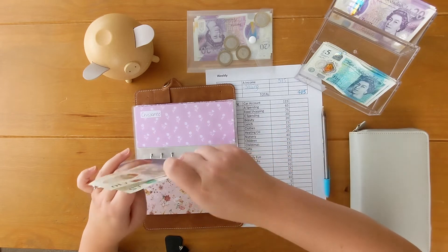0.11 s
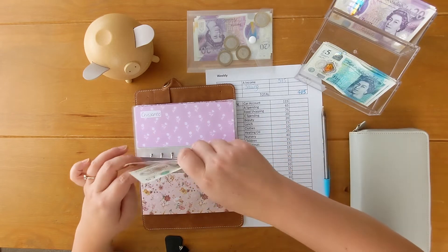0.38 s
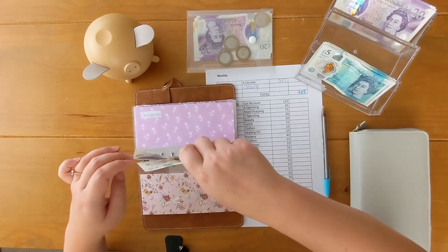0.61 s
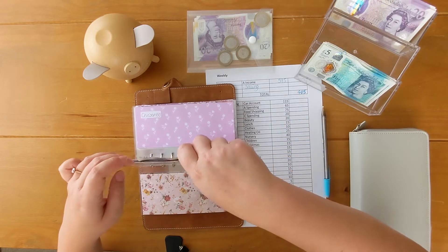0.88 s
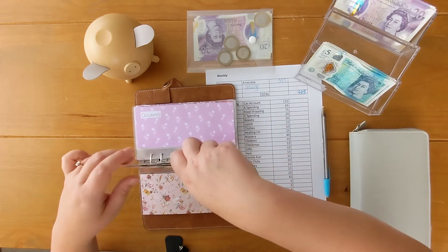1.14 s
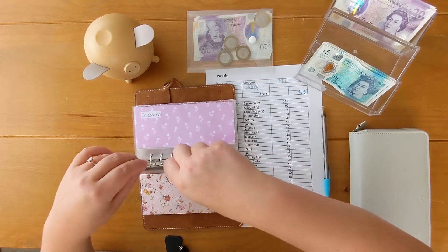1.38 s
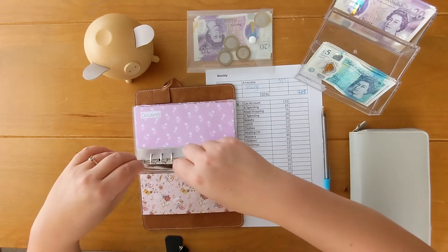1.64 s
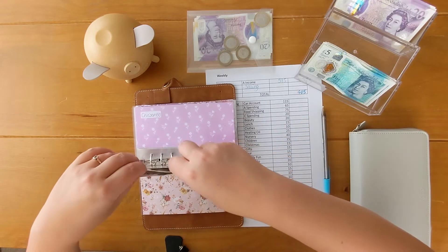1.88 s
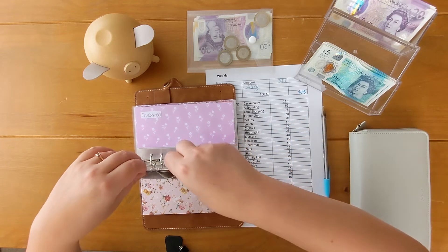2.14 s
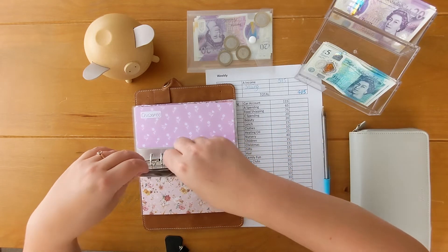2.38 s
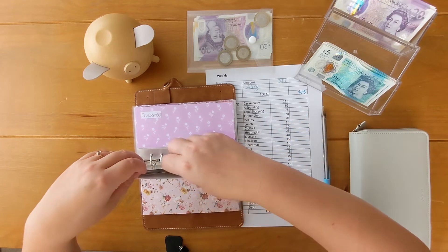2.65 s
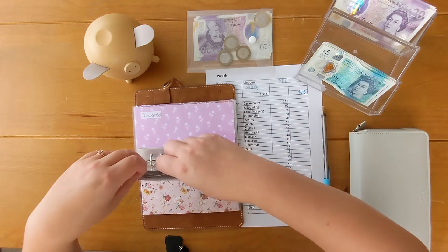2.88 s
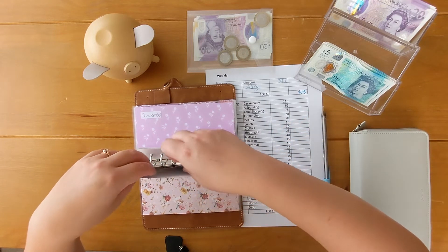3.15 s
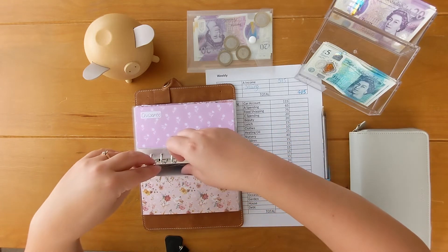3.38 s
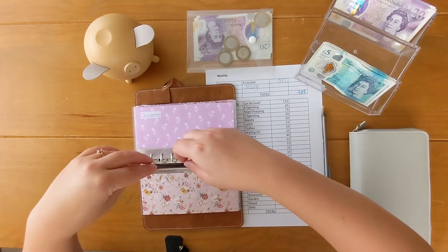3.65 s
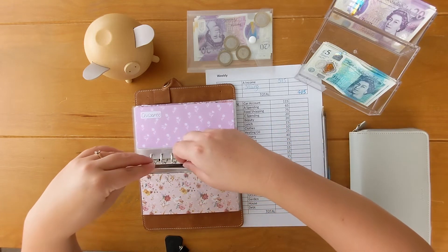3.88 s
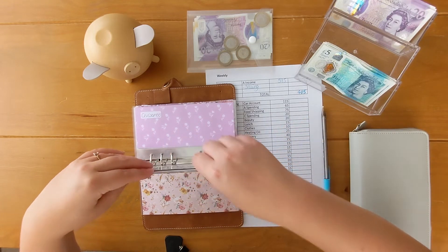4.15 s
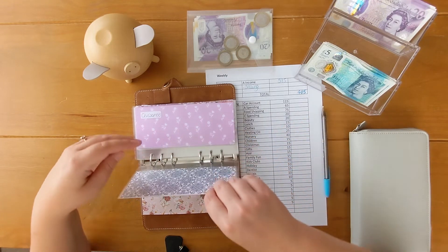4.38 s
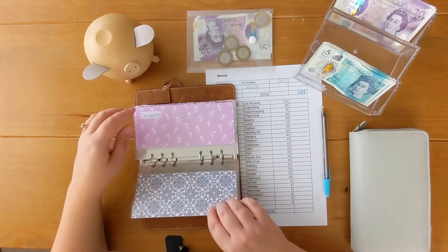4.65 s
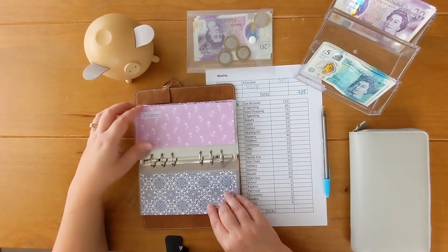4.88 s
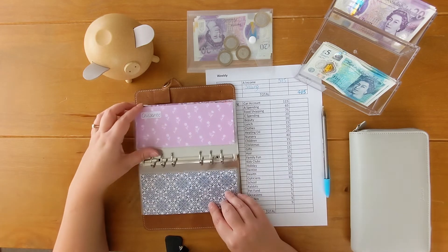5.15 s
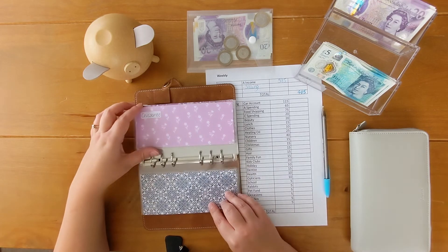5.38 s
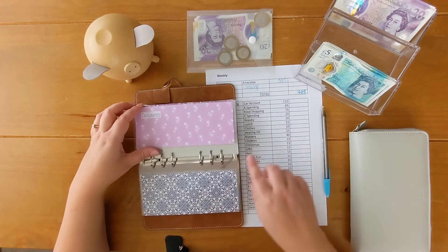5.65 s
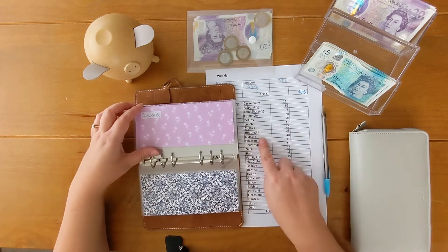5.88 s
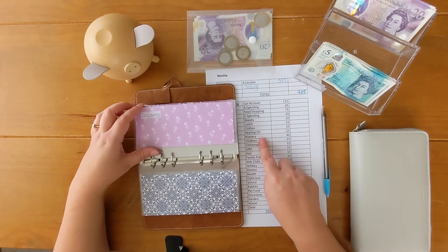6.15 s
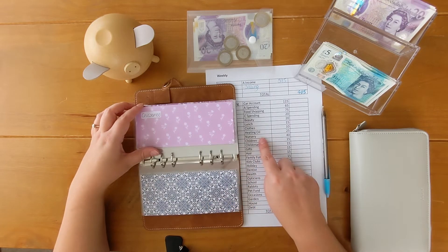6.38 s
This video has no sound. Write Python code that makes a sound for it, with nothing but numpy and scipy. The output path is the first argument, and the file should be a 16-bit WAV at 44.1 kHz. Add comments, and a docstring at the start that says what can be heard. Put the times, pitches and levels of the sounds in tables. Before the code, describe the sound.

Throughout, a one-cylinder lawn mower drones low and muffled outside closed windows, slightly uneven, with a resonant pane hum and thin hiss. In the foreground of a small, short-echoing room, hands work notes into a plastic binder envelope: a soft rub and knock at 0 s, bright crackles and snaps around 0.25-0.35, then duller rubbing and low knocks from 0.5 to 0.8. Crisp short snaps come at 1.1-1.2, light scuffs at 1.5 and 1.75, more rustles and ticks at 2.05-2.5. A sparse spell follows, with faint touches near 3.3-3.4 and a snap at 3.75. The mower grows clearly stronger from about 3.7, pulsing and wavering. The envelope turns with clicks and soft flicks at 4.2-4.5, then settles with brighter snaps and rubs at 4.7-5. From 5.45 to 6.4 a fingertip slides faintly down paper, with a small scuff at 5.8, under the nearing engine.

```python
"""A one-cylinder lawn mower outside closed windows drones throughout and comes nearer: harmonic orders of its
firing rate, resonating panes and a thin hiss of filtered noise. From the start, hands slide notes into a plastic
envelope of a ring binder and turn it: enveloped noise rubs, noise bursts through resonances snap, struck
resonances knock softly. Late on, a fingertip slides down a sheet: grains of noise through fluttering bands.
Snaps and knocks reverberate in a small room over steady room and microphone noise."""
import sys
import numpy as np
from scipy import signal
from scipy.fft import rfft, irfft, next_fast_len
from scipy.io import wavfile

SR = 44100
rng = np.random.default_rng(int(sys.argv[2]) if len(sys.argv) > 2 else 0)


def to_wav(sig):
    """Store sig (one row per channel, or 1-D mono) as 16-bit WAV at the path in sys.argv[1].

    Samples outside -1..1 are clipped; the rate is SR.
    """
    pcm = np.clip(np.atleast_2d(sig), -1, 1) * 32767
    pcm = np.round(pcm).astype(np.int16)
    wavfile.write(sys.argv[1], SR, pcm.T)  # frames by channels


def ratio_of_db(decibels):
    """Turn decibels (scalar or array-like) into linear amplitude factors; 0 dB maps to 1."""
    return 10 ** (np.asarray(decibels, float) / 20)


N = 287300   # samples

# snaps of plastic on the rings; the crack level is relative to the strength:
# start_s, strength_db, low_ring_hz, crack_db, crack_hz
SNAPS = [(0.029, -45.5, 950, 2, 2700), (0.237, -39, 1590, 13, 6100), (0.242, -47, 705, 14.5, 6300),
         (0.332, -41.5, 825, 9.5, 3800), (0.338, -51, 796, 14.5, 6100), (0.654, -46, 910, 5, 5170),
         (1.095, -42, 815, 3, 4700), (1.1775, -45, 720, 10.5, 3970), (1.215, -47.5, 805, 8.5, 2860),
         (2.191, -49, 1140, 6, 4100), (2.382, -50, 1690, 6.5, 7750), (2.403, -50.5, 1000, 6, 4000),
         (3.281, -51.5, 830, 6.5, 2190), (3.754, -43.5, 844, 8.5, 3220), (4.185, -45.5, 1130, -7, 2800),
         (4.306, -51.5, 1600, -11.5, 2960), (4.364, -43, 1550, -3, 2440), (4.499, -49, 770, -23, 2440),
         (4.731, -44, 1600, 7.5, 5040), (4.785, -45.5, 1560, -9, 2790), (4.843, -53, 1510, -19, 2590),
         (4.855, -49, 1770, 9, 4300), (4.953, -50, 1180, -15, 3130)]
HANDS_LAG_S, ENGINE_LAG_S = 0.00013, 0.00008   # the left microphone hears later
FLAT = [(10, 0), (20000, 0)]   # white spectrum: frequency_hz, level_db


def rms_one(x):
    """Normalisation to unit root-mean-square."""
    return x / np.sqrt(np.mean(x ** 2) + 1e-20)


def in_time(rows):
    """Linear interpolation of each column of a curve, one value a sample."""
    s, *columns = np.transpose(rows)
    return [np.interp(np.arange(N) / SR, s, c) for c in columns]


def at_hz(points, hz):
    """Interpolation of a spectrum on a logarithmic frequency axis."""
    point_hz, value = np.array(points).T
    return np.interp(np.log(hz), np.log(np.maximum(point_hz, 1)), value)


def drift(rate_hz):
    """Slow random fluctuation: noise through two equal one-pole low-passes, normalised to spread 1."""
    step = 40   # computed at every 40th sample, then interpolated
    r = np.exp(-2 * np.pi * step * rate_hz / SR)
    noise = rng.standard_normal(N // step + 2002)
    slow = signal.lfilter([1], [1, -2 * r, r * r], noise)[2000:]   # past the filter's onset
    return np.interp(np.arange(N) / step, np.arange(len(slow)), rms_one(slow - slow.mean()))


def coloured(x, spectrum, lag_s):
    """Spectral shaping with partial coherence between the channels and an arrival lag on the left; rms 1."""
    # left-right likeness: frequency_hz, coherence (share)
    likeness = [(60, 0.65), (240, 0.49), (500, 0.27), (950, 0.46), (3770, 0.26), (15000, 0.086)]
    hz = np.maximum(np.fft.rfftfreq(N, 1 / SR), 1)
    mid, side = rfft(x)
    alike = np.clip(at_hz(likeness, hz), 0, 1)
    both = np.sqrt(1 + alike) * mid + np.sqrt(1 - alike) * side * [[1], [-1]]
    both[0] *= np.exp(-2j * np.pi * hz * lag_s)
    return rms_one(irfft(both * ratio_of_db(at_hz(spectrum, hz)), N))


def resonance(x, hz, width_hz):
    """Damped resonator: a click of height 1 rings as a dying sine of initial height 1."""
    r, w = np.exp(-np.pi * width_hz / SR), 2 * np.pi * hz / SR
    return signal.lfilter([0, np.sin(w)], [1, -2 * r * np.cos(w), r * r], x + 1e-18)


def band(x, low_hz, high_hz):
    """Butterworth band-pass filtering."""
    return signal.sosfilt(signal.butter(2, [low_hz, high_hz], "band", fs=SR, output="sos"), x)


def pair(x, lag_s, left_db):
    """Arrival-time and level difference of one source at two microphones, the left one later."""
    n = np.arange(N)
    return np.array([ratio_of_db(left_db) * np.interp(n - lag_s * SR, n, x), x])


def wandering(x, pace):
    """Frequency modulation by reading at an uneven pace, so that the pitch glides."""
    at = np.cumsum(pace) % (N - 1)
    return np.array([np.interp(at, np.arange(N), side) for side in x])


def mower():
    """Periodic combustion: orders locked to the firing cycle, with noise modulated by the firings."""
    # firing rate: time_s, rate_hz
    firing_speed = [(0.0, 22.9), (0.54, 23.2), (0.85, 23.1), (1.18, 22.5), (1.61, 23.4), (1.81, 22.8),
                    (1.98, 22.9), (2.25, 22.4), (2.55, 22.5), (2.7, 23.1), (3.06, 22.6), (3.28, 22.9),
                    (3.64, 22.1), (4.02, 22.4), (4.1, 22.0), (4.21, 21.7), (4.48, 22.7), (4.95, 21.8),
                    (5.06, 22.1), (5.17, 21.8), (5.31, 22.6), (5.56, 22.8), (5.66, 22.7), (5.77, 21.0),
                    (5.91, 22.3), (6.29, 22.7), (6.42, 22.6), (6.51, 22.1)]
    # upper drone; the pane level is relative to the drone, before a fixed offset: time_s, drone_db, pane_db
    upper_curve = [(0.0, -67, 8.5), (2.0, -65.5, 5), (2.5, -65.5, 8), (3.2, -67.5, 9), (3.6, -66.5, -21),
                   (3.8, -63, -12), (4.7, -62.5, -4), (4.9, -62.5, 0), (5.5, -64, 13), (5.72, -59, 6),
                   (5.9, -60.5, 6.5), (6.51, -62, 11)]
    speed, = in_time(firing_speed)
    drone_db, pane_db = in_time(upper_curve)
    # uneven firings: phase jitter in radians
    turn = 2 * np.pi * np.cumsum(speed) / SR + 0.028 * drift(13.3)
    upper = ratio_of_db(drone_db - 5.5) * upper_drone(turn, pane_db)
    tones = low_orders(turn, speed) + second_pane() + upper
    engine = pair(tones, ENGINE_LAG_S, -0.58) + fourth_order(turn)
    return engine + rumble(turn, drone_db) + hiss(turn, speed)


def order_tone(order, level_db, turn):
    """A harmonic of the firing cycle with fluctuating level and dispersed phase."""
    # silencer, wall and window smear each firing: the phase bends with the order and wanders as the mower moves
    phase = 0.2 * (order - 7) ** 2 + 0.6 * drift(2)
    return ratio_of_db(level_db + 1.4 * drift(9)) * np.sqrt(2) * np.cos(order * turn + phase)


def low_orders(turn, speed):
    """Harmonic synthesis: low orders whose levels follow nearness and load, or curves of their own."""
    # the mower comes nearer: time_s, gain_db
    nearing = [(0.0, 0.5), (2.1, 0), (2.4, 3), (2.8, 2), (3.3, 1.5), (3.7, 2), (5.1, 7.5), (5.5, 3.5),
               (6.51, 8)]
    # orders following nearness and load:
    # multiple of the firing rate, far_db, share of the nearing gain, db per firing/s lost, wavering_db
    loaded_orders = [(2, -73.5, 1.0, 1, 0.5), (3, -71.5, 0.9, 3, 1.2), (5, -78, 2.2, 2, 2.5),
                     (7, -57.5, 0.5, 1.5, 1.2), (9, -61.5, 1.3, -5, 1.5), (10, -74, 1.8, 2, 3)]
    # levels of the sixth, eighth and twelfth orders: time_s, level_db
    sixth, eighth, twelfth = [(0.0, -51.5), (3.3, -50), (3.97, -42.5), (4.04, -47), (4.44, -42),
                              (4.51, -53), (4.73, -44), (5.329, -43.5), (5.4, -75), (5.44, -49.5),
                              (5.78, -47.5), (5.82, -64), (5.93, -45), (6.51, -61)], [(0.0, -56), (0.03, -60), (1.92, -55), (2.05, -73), (2.23, -47),
                                             (2.37, -55.5), (2.59, -46), (2.86, -60), (3.01, -47.5),
                                             (3.19, -51.5), (3.3, -70), (3.34, -53), (3.83, -38),
                                             (3.88, -49), (4.13, -39.5), (4.35, -50), (4.41, -47),
                                             (4.71, -59.5), (4.77, -46), (4.95, -35), (5.08, -54),
                                             (5.39, -43.5), (5.56, -53.5), (5.86, -38.5), (6.0, -51.5),
                                             (6.07, -42.5), (6.24, -41.5), (6.36, -55), (6.51, -39)], [(0.0, -70.5), (0.9, -71), (2.0, -77),
                                                             (3.1, -84.5), (4.6, -67), (4.9, -67),
                                                             (5.2, -69), (5.4, -69.5), (6.1, -66),
                                                             (6.35, -63), (6.51, -60.5)]
    near_db, = in_time(nearing)
    free_speed = 23.0   # firings per s without load
    sag = np.minimum(free_speed - speed, 1.2)
    out = np.zeros(N)
    for order, far_db, share, load_db, waver_db in loaded_orders:
        level_db = far_db + share * near_db + load_db * sag + waver_db * drift(3.3)
        out += order_tone(round(order), level_db, turn)
    for order, curve in ((6, sixth), (8, eighth), (12, twelfth)):
        out += order_tone(order, in_time(curve)[0], turn)
    return out


def fourth_order(turn):
    """A standing wave of the room makes the fourth order differ in phase and level at the microphones."""
    # level of the order: time_s, level_db
    fourth = [(0.0, -60), (0.3, -66.5), (0.7, -56), (1.4, -60.5), (2.3, -58.5), (2.55, -59.5), (2.72, -67),
              (3.1, -59), (3.4, -57), (3.7, -52), (4.4, -57), (4.8, -50), (5.4, -52.5), (5.9, -52.5),
              (6.2, -51.5), (6.51, -49.5)]
    return pair(order_tone(4, in_time(fourth)[0], turn), 0.0011, 1.1)


def upper_drone(turn, pane_db):
    """Forced resonance: the upper orders, at rms 1, drive the ringing of a window pane."""
    # upper orders: multiple of the firing rate, level_db relative to the other orders
    upper_orders = [(11, -3), (13, -3), (15, -10), (16, 1.5), (17, -6), (18, 0), (19, -23), (21, -22),
                    (23, -1)]
    upper = sum(ratio_of_db(db + 4.5 * drift(3)) * np.cos(round(k) * turn + 0.4 * drift(1.5))
                for k, db in upper_orders)
    pane = rms_one(resonance(upper, 351, 26))   # Hz, width Hz
    return rms_one(upper) + ratio_of_db(pane_db - 5) * pane


def second_pane():
    """Narrow-band noise: a second pane hums at its own pitch once the mower is close."""
    # level of the hum: time_s, level_db
    hum_level = [(0.0, -98), (4.8, -92), (4.9, -64.5), (5.4, -78), (5.6, -68), (6.1, -60), (6.51, -61.5)]
    pitch_hz, width_hz = 345, 9
    shake = resonance(rng.standard_normal(N), pitch_hz, width_hz)
    return ratio_of_db(in_time(hum_level)[0]) * rms_one(resonance(shake, pitch_hz, 2 * width_hz))


def rumble(turn, drone_db):
    """Amplitude-modulated noise: exhaust noise between the orders, puffing slightly with each firing."""
    # exhaust spectrum: frequency_hz, level_db per Hz
    rumble_colour = [(30, -30), (60, -24), (110, -18), (170, -9), (220, -14), (260, -24), (310, -26),
                     (400, -17), (570, -24), (900, -34), (1500, -60)]
    puff = 1 + 0.021 * np.cos(turn)
    noise = coloured(rng.standard_normal((2, N)), rumble_colour, ENGINE_LAG_S)
    return ratio_of_db(drone_db + 1.5) * puff * noise


def hiss(turn, speed):
    """Flow noise of blade and exhaust through the window gaps, flaring with each firing."""
    # level before a fixed gain, of the air part between flares: time_s, level_db
    hiss_level = [(0.0, -84), (1.52, -81), (3.17, -78.5), (3.55, -76.5), (6.51, -76.5)]
    # spectrum: frequency_hz, level_db per Hz
    hiss_colour = [(350, -61), (600, -16), (1120, -2.5), (1310, -27), (1440, -12), (1720, -11),
                   (3100, -1.5), (9000, -16.5), (11700, -25), (19800, -120)]
    air = coloured(rng.standard_normal((2, N)), hiss_colour, HANDS_LAG_S)
    flare = 1 + 0.45 * (0.5 + 0.5 * np.cos(turn)) ** 3
    level = ratio_of_db(in_time(hiss_level)[0] + 5.0 + 1.53 * drift(11.8))
    return level * flare * (air + ratio_of_db(-6.5) * whirring(speed))


def whirring(speed):
    """Resonant bands of noise, each swelling and wandering in pitch on its own as the speed changes."""
    # whirring bands, levels relative to each other: pitch_hz, width_hz, level_db
    whir_bands = [(511.5, 19, -7.5), (788.5, 24, -6), (1276, 260, -7), (2320, 540, -12), (3160, 99, -7),
                  (3686, 64, -11.5), (4030, 68, -17.5), (4380, 110, -11), (5270, 92, -7.5), (6155, 150, -6),
                  (6970, 720, -1)]
    white = coloured(rng.standard_normal((2, N)), FLAT, HANDS_LAG_S)
    usual_speed = 22.4   # firings per s
    glide = 1 + 0.7 * (speed / usual_speed - 1)   # 0.7 of the relative speed change
    out = np.zeros((2, N))
    for hz, width_hz, db in whir_bands:
        tone = rms_one(resonance(resonance(white, hz, width_hz), hz, width_hz))
        pace = glide + 0.01 * drift(1.5)
        out += ratio_of_db(db + 2.2 * drift(4)) * wandering(tone, pace)
    return out


def friction_grains(spread_db):
    """Stick-slip friction: white noise whose level jumps at every sample and drifts by spread_db."""
    jump_db = 2.5 * np.minimum(rng.exponential(1, N), 5)
    return rng.standard_normal((2, N)) * ratio_of_db(jump_db + spread_db)


def rubbing():
    """Frictional noise of notes and fingers: bright from the plastic, dull where the envelope resonates."""
    # strokes on plastic and paper; bright level is that of the 8-15.5 kHz band:
    # start_s, length_s, bright_db, dull_db, dull_ring_hz
    strokes = [(0, 0.32, -103, -73.5, 1630), (0.024, 0.3, -103, -68.5, 900), (0.243, 0.29, -67, -63, 1480),
               (0.324, 0.19, -70, -65, 760), (0.237, 0.5, -76.5, -77, 3700),
               (0.477, 0.14, -69, -67.5, 1300), (0.5, 0.16, -92, -62.5, 670), (0.616, 0.11, -78, -76, 900),
               (0.69, 0.16, -99, -71.5, 694), (0.818, 0.11, -85, -81, 1000),
               (1.091, 0.051, -69, -57.5, 1430), (1.173, 0.038, -64.5, -57, 1520),
               (1.213, 0.081, -68, -64.5, 1530), (1.481, 0.17, -63.5, -61, 2500),
               (1.757, 0.15, -67, -99, 3100), (2.043, 0.17, -72, -62, 2420), (2.186, 0.031, -66, -77, 1500),
               (2.221, 0.086, -76, -68, 885), (2.403, 0.077, -67, -68, 910), (2.439, 0.16, -75, -64, 1960),
               (3.39, 0.14, -72, -95, 3330), (3.753, 0.061, -75, -58, 1030), (3.969, 0.047, -68, -66, 1290),
               (4.26, 0.096, -82, -90, 1510), (4.722, 0.39, -77, -79, 1610),
               (4.929, 0.064, -66, -60.5, 1510), (5.807, 0.12, -68.5, -91, 3000)]
    # spectrum: frequency_hz, level_db per Hz
    rub_colour = [(290, -22), (500, -21), (562, -1), (795, 6.5), (880, 1), (960, 8), (1840, 11), (2770, 11),
                  (10500, 1), (15100, 2.5), (16000, -77)]
    sound = coloured(friction_grains(1.6 * drift(150)), rub_colour, HANDS_LAG_S)
    bright = band(sound, 2200, 17000) / np.std(band(sound, 8000, 15500))
    # faint uneven rubbing while the notes go in
    s = np.arange(N) / SR
    fidget_start_s, fidget_end_s, fidget_db = 0.19, 2.5, -81
    busy = np.clip(np.minimum(s - fidget_start_s, fidget_end_s - s) / 0.085, 0, 1)
    out = busy * ratio_of_db(fidget_db + 3.0 * drift(0.66)) * bright
    for at, length_s, bright_db, dull_db, dull_hz in strokes:
        nearest = min((snap[0] for snap in SNAPS), key=lambda snap_s: abs(snap_s - at))
        snapped = abs(nearest - at) < 0.008
        at = nearest if snapped else at   # a snap sets the stroke off
        span = slice(round(at * SR), round((at + length_s) * SR))
        share = np.linspace(0, 1, span.stop - span.start)
        skew = 0.33 if snapped else 0.88   # 1 = symmetric, less = earlier peak
        swell = np.sin(np.pi * share ** skew) ** 1.34
        ring = resonance(sound[:, span], dull_hz, 0.7 * dull_hz)
        dull = rms_one(ring + 0.068 * band(sound[:, span], 500, 3000))
        out[:, span] += swell * (ratio_of_db(bright_db) * bright[:, span] + ratio_of_db(dull_db) * dull)
    return out


def snaps():
    """Impulsive excitation: a short dying noise burst drives a crack, a low ring and the envelope's modes."""
    # modes of envelope and binder, levels relative to each other: pitch_hz, width_hz, level_db
    envelope_modes = [(844, 36, 9), (1290, 360, 14), (1600, 75, 10.5), (2500, 50, -39)]
    s = np.arange(int(0.1 * SR)) / SR
    out = np.zeros(N + len(s))
    for at, strength_db, ring_hz, crack_db, crack_hz in SNAPS:
        decay = np.exp(-s / 0.0028) + 0.59 * np.exp(-s / 0.00041) + 0.024 * np.exp(-s / 0.008)
        burst = rng.standard_normal(len(s)) * decay
        late = burst * (1 - np.exp(-s / 0.002))   # ring and modes build up after the crack
        ring = resonance(late, ring_hz, 145)
        modes = sum(ratio_of_db(db + rng.normal(0, 3)) * resonance(late, hz, width_hz)
                    for hz, width_hz, db in envelope_modes)
        crack = burst * (np.exp(-s / 0.0015) + 0.18)   # dies sooner than the ring
        middle = resonance(crack, crack_hz, 0.24 * crack_hz) + 1.6 * band(crack, 1630, 7000)
        treble = band(crack, 6000, 12000)
        parts = ring, modes, middle, treble
        shares = 0.6, 0.22, ratio_of_db(crack_db), ratio_of_db(crack_db - 12.5)
        i = round(at * SR)
        mixed = sum(share * part / abs(part).max() for share, part in zip(shares, parts))
        out[i:i + len(s)] += ratio_of_db(strength_db) * mixed
    return out[:N]


def singing():
    """Resonant filtering: a stroke makes the envelope sing on one narrow tone, rising fast and fading."""
    # sung tones: start_s, length_s, level_db, pitch_hz
    sung_tones = [(0.032, 0.28, -68, 1623), (0.032, 0.14, -82, 2430), (0.05, 0.19, -81, 4660),
                  (0.335, 0.14, -69, 793), (0.34, 0.12, -74, 3710), (2.402, 0.037, -56.5, 820),
                  (4.665, 0.057, -64, 790), (4.973, 0.084, -64, 776)]
    out = np.zeros((2, N))
    for at, length_s, db, hz in sung_tones:
        i, size = round(at * SR), round(length_s * SR)
        noise = pair(rng.standard_normal(N), HANDS_LAG_S, 0)[:, :size]
        width_hz = 0.035 * hz
        tone = rms_one(resonance(resonance(noise, hz, width_hz), hz, 2 * width_hz))
        swell = np.sin(np.pi * np.linspace(0, 1, size) ** 0.2)
        out[:, i:i + size] += ratio_of_db(db) * swell * tone
    return out


def knocks():
    """Impulse response of two damped modes: a soft push of a hand sets the binder ringing dully."""
    # knocks on the binder: start_s, push_db, pitch_hz
    pushes = [(0.029, -52, 259), (0.53, -52, 400), (0.58, -44, 304), (0.73, -48, 307), (0.763, -50, 308),
              (1.219, -56, 283), (4.367, -52, 604)]
    out = np.zeros(N)
    for at, push_db, hz in pushes:
        push = np.zeros(N)
        push[round(at * SR)] = ratio_of_db(push_db)
        out += resonance(push, hz, 54) + 0.83 * resonance(push, 1.38 * hz, 55)
    return out


def slide():
    """Stick-slip of a fingertip on paper excites bands of the sheet, each fluttering on its own."""
    # bands in which the sheet sings, levels relative to each other: pitch_hz, width_hz, level_db
    sheet_bands = [(950, 890, -5), (1380, 170, -4.5), (2590, 170, -9), (3100, 320, -5), (3900, 140, -8),
                   (4460, 500, -1), (4950, 300, -11)]
    start_s, length_s, level_db = 5.44, 1, -64
    grains = coloured(friction_grains(2 * drift(40)), FLAT, HANDS_LAG_S)
    bands = sum(ratio_of_db(db + 2.5 * drift(11)) * rms_one(resonance(grains, hz, width_hz))
                for hz, width_hz, db in sheet_bands)
    sound = rms_one(band(rms_one(bands) + 0.39 * grains, 960, 5500))
    share = np.clip((np.arange(N) / SR - start_s) / length_s, 0, 1)
    return ratio_of_db(level_db) * np.sin(np.pi * share) ** 1.5 * sound


def room(x):
    """Reverberation by recirculating delays, six a side, duller on every round as walls absorb treble."""
    t60_s, wall_cut_hz = 0.098, 4600
    out, dull = np.zeros((2, N)), np.exp(-2 * np.pi * wall_cut_hz / SR)
    lags = (rng.uniform(0.0048, 0.038, 12) * SR).astype(int)   # samples
    for k, lag in enumerate(lags):
        loop, gain, state = x.copy(), ratio_of_db(-60 * lag / SR / t60_s), [0.]
        for i in range(lag, N, lag):
            back, state = signal.lfilter([gain * (1 - dull)], [1, -dull], loop[i - lag:i], zi=state)
            loop[i:i + lag] += back[:N - i]
        out[k % 2] += (loop - x) * (-1) ** (k // 2)
    return out


def noise_floor():
    """Stationary coloured noise of room and microphones."""
    # spectrum: frequency_hz, level_db per Hz
    floor_colour = [(290, -42), (500, -11), (708, -10.5), (784, -2), (933, -7.5), (1840, -8.5),
                    (3110, -17.5), (5710, -29), (7000, -15.5), (7980, -23.5), (10800, -25), (15100, -15),
                    (16000, -26)]
    return ratio_of_db(-72.5) * coloured(rng.standard_normal((2, N)), floor_colour, HANDS_LAG_S)


def scene():
    """Superposition of the mower outside, the hands close by, the room and its noise."""
    hits = snaps() + knocks()
    hands = rubbing() + singing() + slide() + pair(hits, HANDS_LAG_S, -4.5)
    return mower() + hands + ratio_of_db(-7.5) * room(hits) + noise_floor()


def low_pass(x):
    """Removes everything above the highest recorded frequency."""
    return signal.sosfilt(signal.butter(12, 16500, fs=SR, output="sos"), x)


def record(dry):
    """Linear filtering: the two microphones differ a little in colour."""
    # microphone colours: frequency_hz, left_minus_right_db
    sides = [(200, 0.84), (950, -1), (3000, 0), (6000, -2), (9000, 0.5), (13000, -5)]
    size = next_fast_len(N + SR // 4)
    hz = np.maximum(np.fft.rfftfreq(size, 1 / SR), 1)
    half = ratio_of_db(at_hz(sides, hz) / 2)   # half the difference on each side
    padded = np.pad(dry, ((0, 0), (0, size - N)), "reflect")
    mix = irfft(rfft(padded) * [half, 1 / half], size)[:, :N]
    return low_pass(mix)


dry = scene()
out = record(dry)
to_wav(out)
```